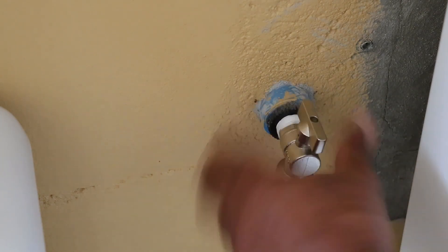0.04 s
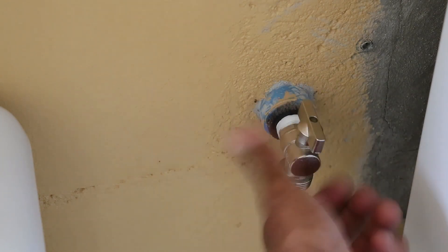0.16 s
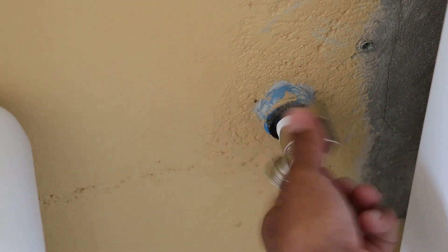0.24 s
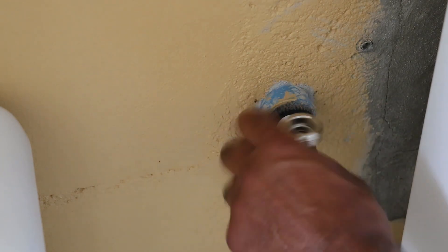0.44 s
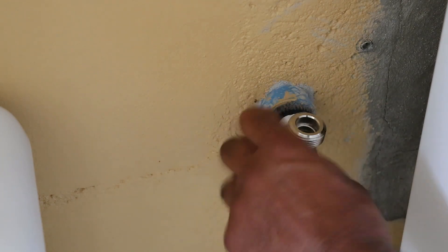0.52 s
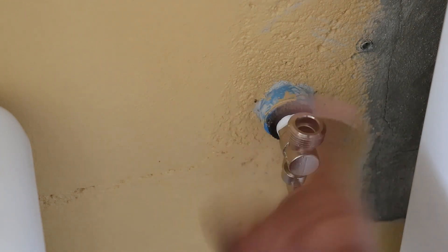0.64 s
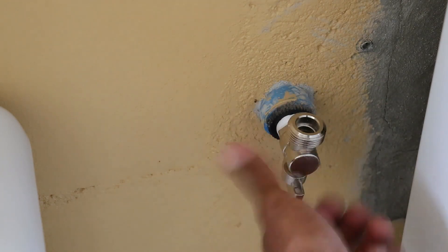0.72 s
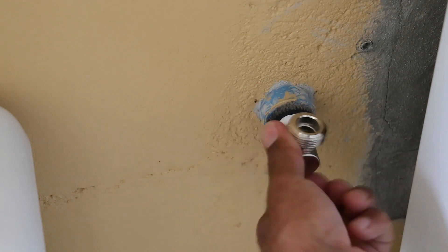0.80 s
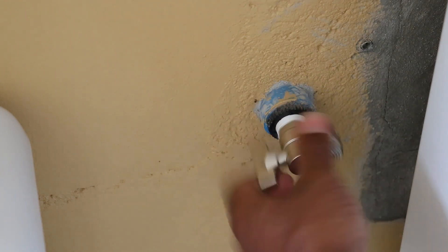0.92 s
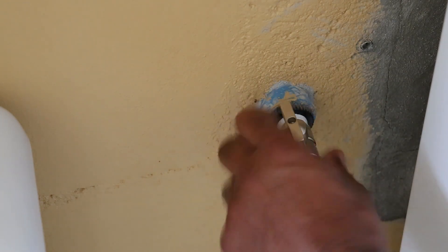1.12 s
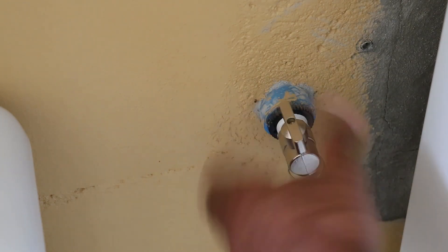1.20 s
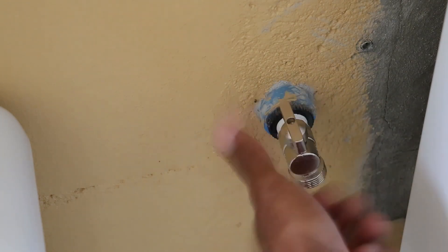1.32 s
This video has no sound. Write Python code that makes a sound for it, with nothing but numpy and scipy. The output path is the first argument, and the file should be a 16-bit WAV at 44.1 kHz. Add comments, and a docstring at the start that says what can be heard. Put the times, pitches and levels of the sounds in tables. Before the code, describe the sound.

A metal valve knocks as a hand screws it onto a wall pipe: a clack at 0.2 seconds, the loudest and sharpest at 0.35, and a soft one at 0.9. Each has a hollow thud and a brief ring in a small, hard-walled room. Faint finger ticks, thread rubbing and palm shuffling come at the start, around 0.5 and after 1.1 seconds, over quiet room noise and low hum.

```python
"""Three metallic knocks sound in a small, hard-walled room as a hand screws an angle valve onto a wall pipe.
At each knock the metal clacks, the pipe thuds in the wall, and valve, pipe and room ring briefly.
Between knocks fingers tick across the metal, the taped thread rubs and the palm shuffles,
over steady room noise and a low hum."""
import sys
import numpy as np
from scipy import signal
from scipy.fft import rfft, irfft
from scipy.io import wavfile

SR = 44100
rng = np.random.default_rng(int(sys.argv[2]) if len(sys.argv) > 2 else 0)


def dump_mix(stems):
    """Bounce the given channels to the path in sys.argv[1] as a 16-bit WAV at rate SR."""
    frames = np.atleast_2d(stems).T  # one column per channel
    limited = np.clip(frames, -1, 1)  # hard clip at full scale
    pcm = np.round(limited * 32767).astype(np.int16)
    wavfile.write(sys.argv[1], SR, pcm)


N = 59535

# Each row: start in seconds, clack in dB, valve ring in dB, thud in dB, thud pitch in Hz, pipe ring in dB,
# crack in dB, rebound delay in seconds, rebound against the first blow in dB, room send of the blows in dB.
KNOCKS = [(0.2028, -13.5, -10.5, -10.5, 499, -21, -35.5, .0024, 2.5, 4),
          (0.3389, 0, -8.5, -8, 536, -10.5, -15, .0007, -16, 2.5),
          (0.8994, -25.5, -29, -19, 470, -25.5, -41.5, 0.00079, 9, 3)]
# One clack spectrum per knock, each at another spot on the valve. Each point: frequency in Hz, level in dB.
CLACK_SPECTRA = [
    [(700, -12), (1400, -17.5), (1650, -9.5), (2100, -7.5), (2350, 1.5), (2700, 2), (3100, -9.5), (3600, 4),
     (3950, -19), (4300, -11), (5600, -24), (9000, -40)],
    [(700, -32), (1200, -13.5), (1580, -10.5), (1760, 0), (2200, -1), (2950, 2.5), (3500, -3.5),
     (4300, -23), (5200, -28.5), (9000, -54)],
    [(700, -14), (1500, -23.5), (1850, -1), (2400, -2.5), (2900, 1.5), (3200, -15.5), (4500, -12),
     (5500, -27), (9000, -69)],
]
# Crack of metal on metal. Each row: frequency in Hz, spectral level in dB.
CRACK_SPECTRUM = [(160, -16), (400, -26), (650, -4), (1200, -9.5), (3000, -6.5), (4300, 5.5), (5200, 0),
                  (7500, -4), (9500, -7), (11500, -21), (15500, -35)]
BLOW_PAN_DB, PIPE_PAN_DB = -4, 2.5
THUD_ROOM_DB, RING_ROOM_DB = -10, -5


def knocks(walls):
    """Each blow and its rebound clack and crack; the pipe thuds, and valve and pipe ring on."""
    valve, pipe = valve_ring(), pipe_ring()
    crack = band(click(CRACK_SPECTRUM), 240, 17000)
    blow_path = pan(BLOW_PAN_DB) * pulse(0)
    thud_path = pan(PIPE_PAN_DB) * pulse(0) + undb(THUD_ROOM_DB) * walls
    ring_path = pulse(0) + undb(RING_ROOM_DB) * walls
    out = 0
    for row, spectrum in zip(KNOCKS, CLACK_SPECTRA):
        at_s, clack_db, valve_db, thud_db, thud_hz, pipe_db, crack_db, rebound_s, rebound_db, room_db = row
        clack = click(spectrum)
        blows = pulse(at_s) + undb(rebound_db) * pulse(at_s + rebound_s)
        impact = through(blows, undb(clack_db) * clack + undb(crack_db) * crack)
        out += through(impact, blow_path + undb(room_db) * walls)
        thud = undb(thud_db) * pipe_thud(thud_hz)
        ringing = undb(valve_db) * unit(through(valve, clack))
        ringing += pan(PIPE_PAN_DB) * undb(pipe_db) * pipe
        body = through(thud, thud_path) + through(ringing, ring_path)
        out += through(pulse(at_s), body)
    return out


# Valve body. Each row: frequency in Hz, level in dB, T60 in seconds.
VALVE_MODES = [(1533, 12, 0.13), (1789, 7.5, 0.085), (2010, -17, 0.16), (2020, -16, 0.15), (2240, 4, 0.1),
               (2203, 6, 0.26), (2540, 3, 0.16), (2840, 8.5, 0.21), (2870, 3, .09), (3200, 0, 0.044),
               (3198, 10, 0.057), (3330, -15, 0.029), (3476, -16, 0.16)]


def valve_ring():
    """The struck valve body rings in bright modes."""
    return ring(VALVE_MODES)


# Upper modes of the thud. Each row: frequency in Hz, level in dB, T60 in seconds.
THUD_MODES = [(775, 0, .045), (850, -1, .035), (660, -9, .05)]


def pipe_thud(low_hz, low_t60_s=.07):
    """The pipe hits the wall: a short, hollow low mode under fixed upper ones."""
    return band(ring([(low_hz, 0, low_t60_s)] + THUD_MODES), 280, 1500)


# Pipe in the wall. Each row: frequency in Hz, level in dB, T60 in seconds.
PIPE_MODES = [(345, -7, .16), (455, -7, .12), (520, -2, .18), (586, 0, .22), (665, -2, .18), (720, -5, .16),
              (786, -4, .18), (832, -2, .15), (960, -6, .16), (1078, -5, .24)]


def pipe_ring():
    """The pipe rings below the valve."""
    return band(ring(PIPE_MODES), 364, 960)


# Skin catches. Each row: start in seconds, level in dB.
TICKS = [(.021, -41), (.026, -45.5), (.037, -40.5), (.356, -40), (0.41, -39.5), (.426, -46), (0.4952, -40),
         (0.497, -31.5), (.531, -41), (.535, -37.5), (.549, -42), (1.069, -43)]
# Finger slides. Each row: centre in seconds, half length in seconds, level in dB.
SLIDES = [(.015, 0.019, -65.5), (.105, 0.01, -72), (.44, 0.055, -75), (.524, 0.023, -65),
          (1.075, 0.039, -68)]
# Skin on metal. Each row: frequency in Hz, spectral level in dB.
SKIN_SPECTRUM = [(2000, -34), (6500, -14), (8800, 4), (11500, -4.5), (13500, -10), (15500, -18)]
TICK_T60_S, TICK_PAN_DB, SLIDE_PAN_DB, FINGER_ROOM_DB = .005, -12.5, -6, -17


def fingers(walls):
    """Skin ticks as it catches on the metal and crackles as it slides."""
    catches = sum(undb(db) * pulse(at_s) for at_s, db in TICKS)
    ticks = through(catches, unit(rng.standard_normal(N) * fade(TICK_T60_S)))
    slides = stick_slip(grains_per_s=2400) * swells(SLIDES)
    direct = pan(TICK_PAN_DB) * ticks + pan(SLIDE_PAN_DB) * slides
    reflected = undb(FINGER_ROOM_DB) * through(ticks + slides, walls)
    return through(direct + reflected, click(SKIN_SPECTRUM))


# Thread rubs. Each row: centre in seconds, half length in seconds, level in dB.
RUBS = [(.13, 0.04, -61), (.51, 0.047, -58.5), (1.125, 0.062, -56.5)]
# Thread friction. Each row: frequency in Hz, spectral level in dB.
RUB_SPECTRUM = [(400, -21), (1300, -7), (1800, -1.5), (2200, 0), (2700, 3.5), (3500, -10.5), (6300, -4.5),
                (9000, -18.5), (15000, -33)]


def thread_rub():
    """The taped thread sticks and slips as it turns."""
    return through(stick_slip(grains_per_s=1100) * swells(RUBS), click(RUB_SPECTRUM))


# Grip shifts. Each row: centre in seconds, half length in seconds, level in dB.
GRIPS = [(.06, 0.021, -57), (.172, 0.018, -49.5), (1.215, 0.073, -57.5)]
# Palm friction. Each row: frequency in Hz, spectral level in dB.
GRIP_SPECTRUM = [(100, -18), (250, 9), (380, 23), (550, -35), (900, -10), (2500, -44)]


def palm_shuffle():
    """The palm shuffles dully on the valve as the grip shifts."""
    return noise(GRIP_SPECTRUM) * swells(GRIPS)


# Echoes off the nearest surfaces. Each row: delay in seconds, left in dB, right in dB.
ECHOES = [(.0011, -27, -24), (.0033, -6, -35), (.0068, -37, -25), (.0113, -18, -45)]
# Room tail. Each row: band centre in Hz, level in dB, T60 in seconds.
TAIL_BANDS = [(245, -5, 0.42), (540, 10.5, 0.32), (1000, 7.5, 0.26), (1790, 2.5, 0.31), (2900, -3, 0.2),
              (8000, -4.5, 0.45), (13900, 4, 0.099)]
SCATTER_DB, SCATTER_T60_S = -1, 0.048
TAIL_DB, TAIL_BUILD_S = -1, 0.002


def room():
    """Wall reflections only: near echoes, quick scatter and a tail that decays band by band."""
    t, hz = np.arange(N) / SR, np.fft.rfftfreq(N, 1 / SR)
    near = sum(pulse(delay_s) * undb([[left], [right]]) for delay_s, left, right in ECHOES)
    scatter = unit(diffuse() * fade(SCATTER_T60_S) * (t > ECHOES[0][0]))
    build = 1 - np.exp(-t / TAIL_BUILD_S)
    spectrum, tail = rfft(diffuse()), 0
    for centre_hz, db, t60_s in TAIL_BANDS:
        share = along([(row[0], row[0] == centre_hz) for row in TAIL_BANDS], hz)  # triangular band
        tail += undb(db) * irfft(spectrum * share, N) * unit(fade(t60_s) * build)
    return near + undb(SCATTER_DB) * scatter + undb(TAIL_DB) * tail


# Diffuse field. Each row: frequency in Hz, left-right correlation.
EAR_CORRELATION = [(200, 0.97), (500, 0.98), (1200, 0.07), (4000, 0), (10000, 0.025)]


def diffuse():
    """Stereo noise, alike in both ears in the bass only."""
    mid, side = rfft(rng.standard_normal((2, N)))
    likeness = np.clip(along(EAR_CORRELATION, np.fft.rfftfreq(N, 1 / SR)), -.9, .9)
    spectrum = np.sqrt(1 + likeness) * mid + np.sqrt(1 - likeness) * side * np.array([[1], [-1]])
    return irfft(spectrum, N) / np.sqrt(2)


# Room noise. Each row: frequency in Hz, spectral level in dB.
AIR_SPECTRUM = [(12, -33), (20, -10.5), (98, -1.5), (393, -2), (667, -7.5), (834, -9.5), (958, -12),
                (1300, -12), (1450, -17), (1630, -12), (1770, -17.5), (1920, -13.5), (2270, -17),
                (2470, -16.5), (6190, -22), (9660, -27.5), (11400, -31.5), (13100, -32), (15500, -36)]
# Its stereo width. Each row: frequency in Hz, side against mid in dB.
AIR_WIDTH = [(40, -4), (130, -3.5), (320, -7), (700, -2.5), (2000, 0.5), (10000, 1)]
AIR_MID_DB = -54.5


def air():
    """Steady room noise, strongest in the bass and widest in the treble."""
    side_gain = undb(along(AIR_WIDTH, np.fft.rfftfreq(N, 1 / SR)))
    side = irfft(rfft(noise(AIR_SPECTRUM)) * side_gain, N)
    return undb(AIR_MID_DB) * (noise(AIR_SPECTRUM) + side * np.array([[1], [-1]]))


# Room hum. Each row: frequency in Hz, level in dB.
HUM_TONES = [(59.5, -63.5), (85, -62), (119, -61.5), (145, -65), (301, -63), (342, -62), (463, -65)]
HUM_WAVER_HZ, HUM_WAVER_DB = 2.78, 1.5


def hum():
    """Faint low tones waver in level and pitch."""
    out = 0
    for hz, db in HUM_TONES:
        gain = undb(db + HUM_WAVER_DB * wander(knots_per_s=3))
        pitch_hz = hz + HUM_WAVER_HZ * wander(knots_per_s=12.15)
        out += gain * np.sin(2 * np.pi * np.cumsum(pitch_hz) / SR)
    return out


def ring(modes, skew_rad=0.57):
    """Decaying modes, weighted by energy, a little out of phase between the ears."""
    t, out = np.arange(N) / SR, 0
    for (hz, db, t60_s), sign in zip(modes, rng.choice([-1., 1.], len(modes))):
        phase = 2 * np.pi * hz * t + sign * skew_rad * np.array([[1], [-1]])
        out += undb(db) * unit(np.sin(phase) * fade(t60_s))
    return unit(out)


def stick_slip(grains_per_s, spread_db=1.5):
    """Friction as irregular tiny clicks of uneven size, rms one."""
    hits = rng.random(N) < grains_per_s / SR
    sizes = undb(spread_db * rng.standard_normal(N))
    signs = np.sign(rng.standard_normal(N))
    return unit(hits * sizes * signs) * np.sqrt(N)


def swells(rows):
    """Gaussian rises and falls of pressure."""
    t = np.arange(N) / SR
    return sum(undb(db) * np.exp(-((t - at_s) / half_s) ** 2 / 2) for at_s, half_s, db in rows)


def click(spectrum, size=2048):
    """Minimum-phase click with the given spectrum, energy one."""
    cepstrum = irfft(along(spectrum, np.fft.rfftfreq(size, 1 / SR)) * np.log(10) / 20)
    cepstrum[1:size // 2] *= 2
    cepstrum[size // 2 + 1:] = 0
    return np.pad(unit(irfft(np.exp(rfft(cepstrum)))), (0, N - size))


def noise(spectrum):
    """Noise with the given spectrum, rms one."""
    gain = undb(along(spectrum, np.fft.rfftfreq(N, 1 / SR)))
    return unit(irfft(rfft(rng.standard_normal(N)) * gain, N)) * np.sqrt(N)


def wander(knots_per_s):
    """Slow random drift with a spread near one."""
    knots = rng.standard_normal(200)
    return np.interp(np.arange(N) / SR * knots_per_s, np.arange(len(knots)), knots)


def pulse(at_s):
    """Unit impulse."""
    return 1. * (np.arange(N) == int(at_s * SR))


def fade(t60_s):
    """Exponential decay."""
    return np.exp(-np.log(1000) * np.arange(N) / SR / t60_s)


def through(x, response):
    """Convolve with an impulse response."""
    return signal.fftconvolve(np.atleast_2d(x), np.atleast_2d(response), axes=-1)[:, :N]


def band(x, lo_hz, hi_hz):
    """Band-pass filter."""
    return signal.sosfilt(signal.butter(2, [lo_hz, hi_hz], "band", fs=SR, output="sos"), x + 1e-18)


def along(points, hz):
    """Interpolate (Hz, value) points over log frequency."""
    point_hz, values = np.array(points).T
    return np.interp(np.log(hz + 1e-9), np.log(point_hz), values)


def pan(db):
    """Stereo gains for a left-minus-right level."""
    return undb(np.array([[db], [-db]]) / 2)


def unit(x):
    """Scale each channel to energy one."""
    return x / np.sqrt(np.sum(x ** 2, axis=-1, keepdims=True))


def undb(db):
    """Decibels to gain."""
    return 10 ** (np.asarray(db) / 20)


def scene():
    """Knocks and handling share one small room, over its noise and hum."""
    walls = room()
    contacts = knocks(walls) + fingers(walls)
    turning = through(thread_rub() + palm_shuffle(), unit(pulse(0) + walls))
    return contacts + turning + air() + hum()


def record(dry, top_hz=15750):
    """A steep low-pass cuts the highest treble."""
    return signal.sosfilt(signal.ellip(10, .2, 70, top_hz, fs=SR, output="sos"), dry)


dry = scene()
out = record(dry)
dump_mix(out)
```